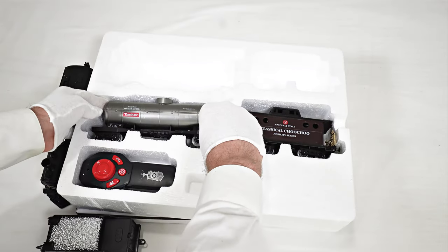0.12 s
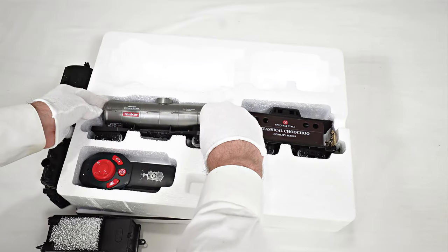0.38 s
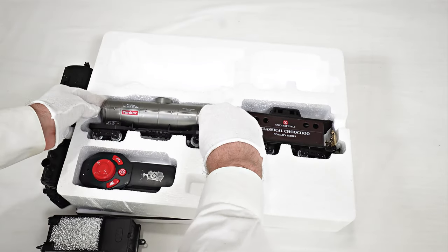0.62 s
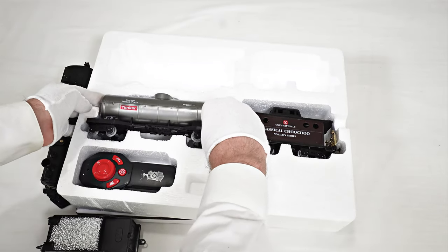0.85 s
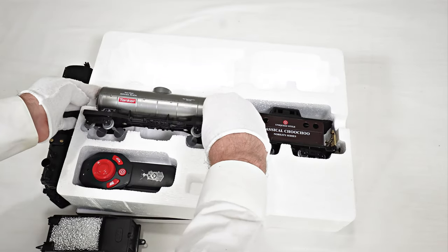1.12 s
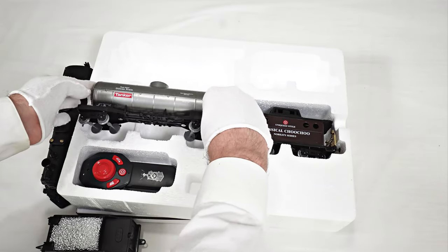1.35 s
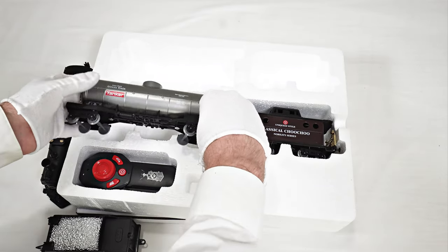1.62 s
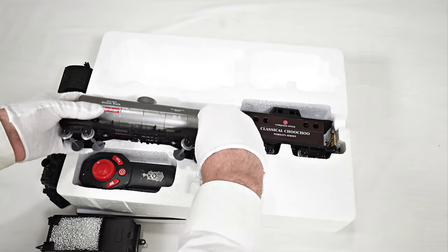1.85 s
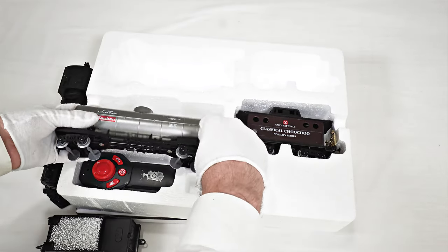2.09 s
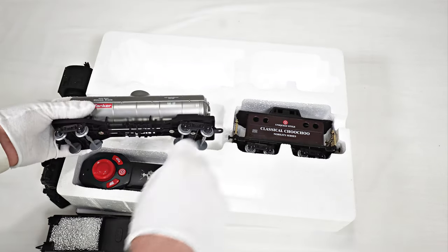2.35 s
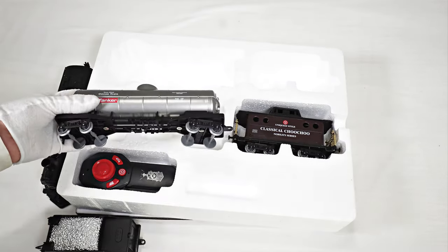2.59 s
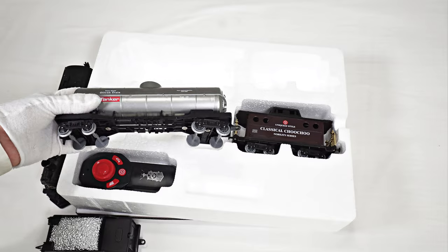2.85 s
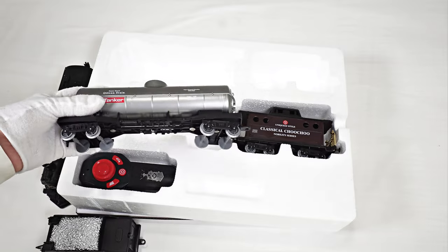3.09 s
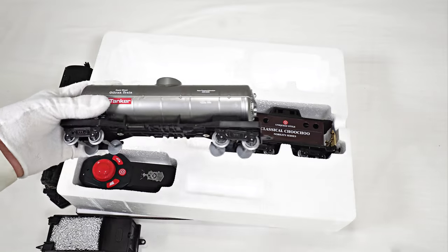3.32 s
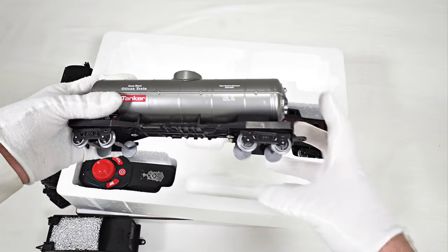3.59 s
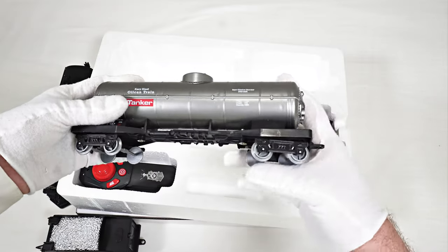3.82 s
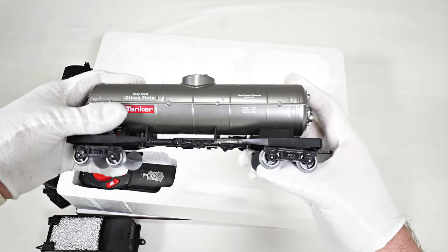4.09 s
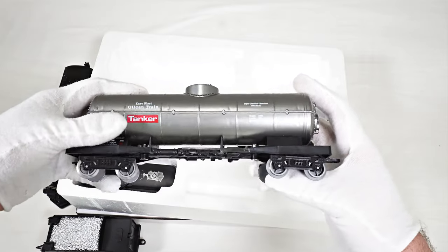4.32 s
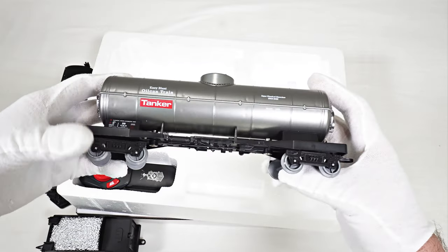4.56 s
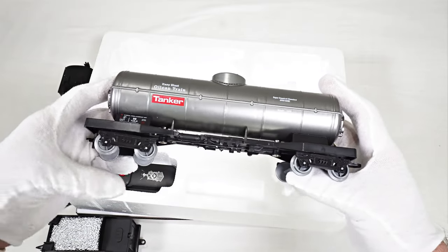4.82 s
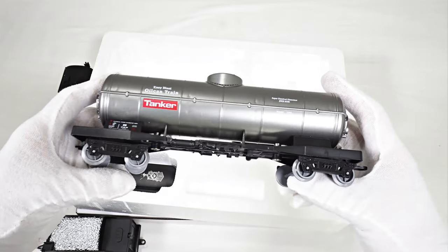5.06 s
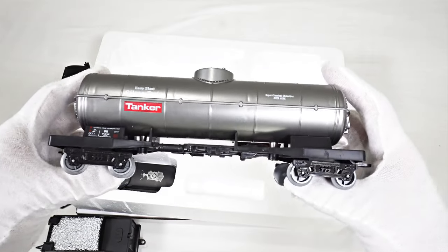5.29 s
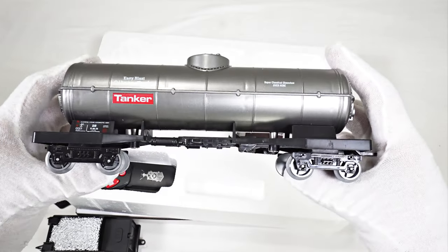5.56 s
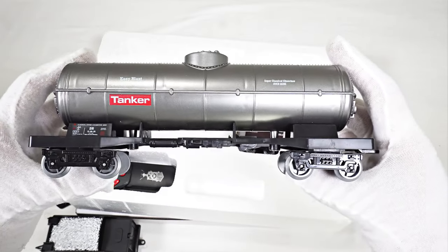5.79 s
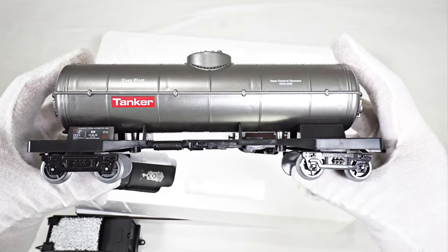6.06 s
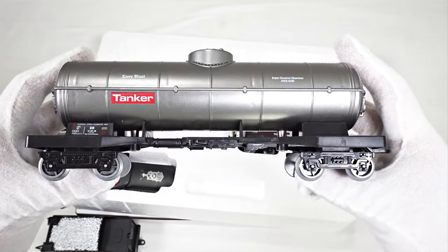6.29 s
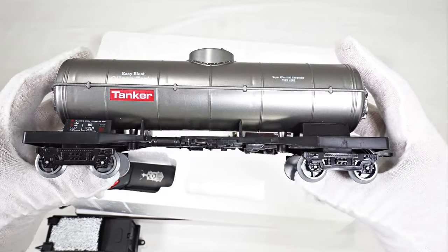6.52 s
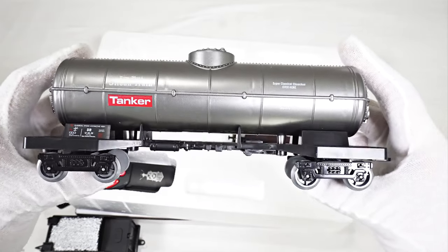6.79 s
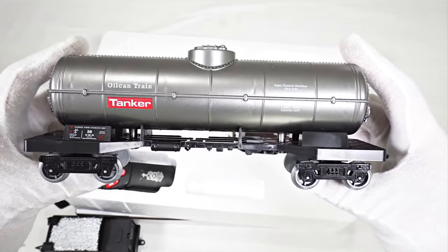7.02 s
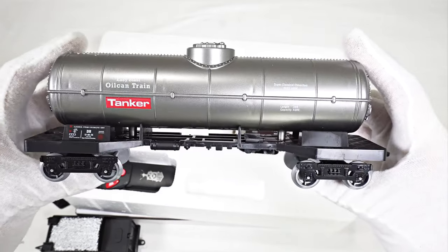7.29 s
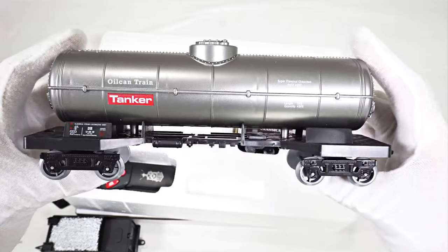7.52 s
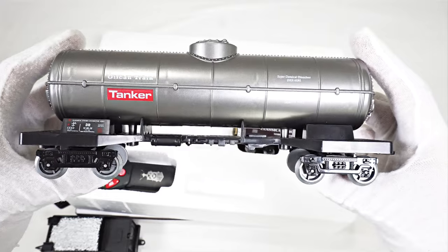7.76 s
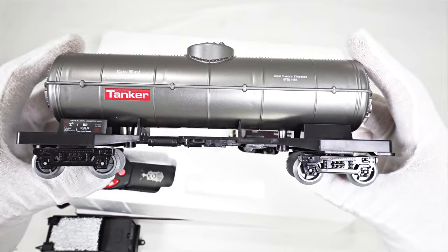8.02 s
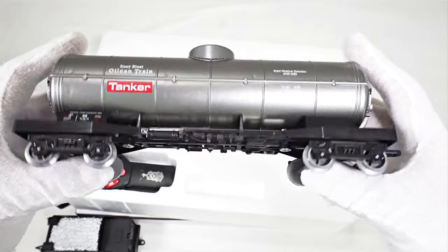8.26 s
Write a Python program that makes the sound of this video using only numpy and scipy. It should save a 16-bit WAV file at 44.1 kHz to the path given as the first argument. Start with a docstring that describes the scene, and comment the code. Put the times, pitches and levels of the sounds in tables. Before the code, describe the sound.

A close stereo pickup in a small, quiet room with faint hiss and low hum. From 0 to 0.4 s, foam rasps and bumps as a plastic toy tank car is tugged in its tray. Stronger, fizzing scrapes run from 0.55 to 1.1 s, with two faint thin squeaks and a loud, very short one near 0.85 s; a last scrape with a slight squeal comes around 1.4 s. From 1.65 to 2.3 s, plastic knocks and loose wheels clatter, sharpest just before 2 s. A soft sleeve swish passes around 2.7 s. Bright clicks return near 4 s, then irregular knocks, wheel chatter and hollow glove rubbing until 4.9 s. Another cluster of clacks at 5.2-5.4 s ends with a soft fingertip thump. Afterwards only quiet rustle and sparse, faint ticks remain, with a clearer click near 8.3 s.

```python
"""A small quiet room: gloved hands pull a plastic toy tank car out of a foam tray and turn it over.
The foam rasps and fizzes as its beads slip, and squeaks once loudly and twice faintly in regular slips.
Knocks and chattering loose wheel sets ring the shell's modes; fingertips thump the tank softly.
Gloves and sleeves rustle as coloured grains, which the hollow tank resonates. Room reflections follow
the near sounds; a faint hum and hiss lie below."""
import sys
import numpy as np
from scipy import signal
from scipy.fft import rfft, irfft
from scipy.io import wavfile

SR = 44100
rng = np.random.default_rng(int(sys.argv[2]) if len(sys.argv) > 2 else 0)


def level_to_linear(level):
    """Convert decibel levels to linear amplitude factors, elementwise."""
    exponent = np.asarray(level, float) / 20
    return 10 ** exponent


def wrap_up_sound(samples):
    """Save the sound to the file named by the first command line argument, as 16-bit audio."""
    columns = np.atleast_2d(samples).T
    # keep every value between -1 and 1, then stretch to whole-number steps
    tamed = np.clip(columns, -1, 1)
    steps = np.round(tamed * 32767).astype(np.int16)
    wavfile.write(sys.argv[1], SR, steps)


N = 369999


def rms_one(x):
    """Scale to unit rms."""
    return x / np.sqrt(np.mean(x ** 2) + 1e-20)


def in_time(rows):
    """Columns of a curve at every sample, after a gate that fades in and out at its ends."""
    s, *columns = np.transpose(rows)
    t = np.arange(N) / SR
    gate = np.clip(np.minimum(t - s[0] + .01, s[-1] + .01 - t) / .01, 0, 1)
    return gate, *[np.interp(t, s, c) for c in columns]


def at_hz(points, hz):
    """Read a spectrum on a log-frequency axis."""
    return np.interp(np.log(hz), np.log(np.array(points)[:, 0]), np.array(points)[:, 1])


def colour(x, spectrum):
    """Give a flat sound a spectrum; rms 1."""
    hz = np.maximum(np.fft.rfftfreq(x.shape[-1], 1 / SR), 1)
    return rms_one(irfft(rfft(x) * level_to_linear(at_hz(spectrum, hz)), x.shape[-1]))


def resonate(x, peaks):
    """Parallel resonances with alternating signs; rms 1."""
    out = 0
    for k, (hz, width_hz, db) in enumerate(peaks):
        r = np.exp(-np.pi * width_hz / SR)
        poles = [1, -2 * r * np.cos(2 * np.pi * hz / SR), r * r]
        out = out + (-1) ** k * level_to_linear(db) * signal.lfilter([1 - r * r, 0, r * r - 1], poles, x)
    return rms_one(out)


def ring(clicks, hz, t60):
    """A unit click sets a decaying sine of starting height 1 ringing."""
    r, w = level_to_linear(-60 / (t60 * SR)), 2 * np.pi * hz / SR
    return signal.lfilter([np.sin(w)], [1, -2 * r * np.cos(w), r * r], clicks + 1e-18)


def grains(per_s, spread_db):
    """Random clicks of either sign with a long tail of sizes."""
    size = level_to_linear(spread_db * np.minimum(rng.exponential(1, N), 4)) * rng.choice([-1, 1], N)
    return size * (rng.random(N) < per_s / SR)


def pan(x, db):
    """Place between the ears by left-over-right level."""
    return x * level_to_linear(np.array([db / 2, -db / 2]).reshape(2, -1))


def wide(make, alike):
    """A spread source: a shared draw plus and minus another."""
    alike = np.clip(alike, 0, 1)
    shared = np.sqrt((1 + alike) / 2) * make()
    return shared + np.sqrt((1 - alike) / 2) * make() * [[1], [-1]]


def swells(s, db, rise_db_per_s, fall_db_per_s):
    """Power-summed gain of efforts that build to a peak and die away, each along straight dB slopes."""
    t, power = np.arange(0, N + 32, 32) / SR, 1e-20
    for peak_s, peak_db, rise in np.broadcast(s, db, rise_db_per_s):
        slope_db = np.maximum(rise * (peak_s - t), fall_db_per_s * (t - peak_s))
        power = power + level_to_linear(2 * (peak_db - slope_db))
    return np.interp(np.arange(N) / SR, t, np.sqrt(power))


def drift(rate_hz):
    """Slow random wander with spread 1, drawn every 32 samples."""
    r = np.exp(-64 * np.pi * rate_hz / SR)
    slow = signal.lfilter([1], [1, -2 * r, r * r], rng.standard_normal(N // 32 + 1002))[1000:]
    return np.interp(np.arange(N) / 32, np.arange(len(slow)), rms_one(slow))


def floor():
    """Room tone and hiss, most alike in both ears in the bass, partly alike around 1.6 kHz and at the top,
    with a low hum of wavering pitch."""
    # room tone: f/Hz, level per Hz/dB
    tone = [(15, -35.5), (25, -14), (59, -10), (484, -16.5), (668, -24), (807, -25), (974, -35.5),
            (1140, -21.5), (2180, -24), (15600, -31.5)]
    # left-right likeness: f/Hz, correlation (negative counts as none)
    likeness = [(60, 0.99), (180, 0.63), (550, -0.72), (1650, 0.54), (4970, -0.44), (15000, 0.32)]
    tone_db, hum_db = -59.5, -66.5  # rms
    hum_hz, waver_hz = 58, 4.5
    alike = np.clip(at_hz(likeness, np.maximum(np.fft.rfftfreq(N, 1 / SR), 1)), 0, 1)
    mid, side = rfft(rng.standard_normal((2, N)))
    hiss = irfft(np.sqrt(1 + alike) * mid + np.sqrt(1 - alike) * side * [[1], [-1]], N)
    waver = rms_one(signal.lfilter([1], [1, -np.exp(-2 * np.pi * 4.35 / SR)], rng.standard_normal(N)))
    hum = np.sqrt(2) * np.sin(2 * np.pi * np.cumsum(hum_hz + waver_hz * waver) / SR)
    return level_to_linear(tone_db) * colour(hiss, tone) + level_to_linear(hum_db) * hum


def drag():
    """Foam beads slip by the thousand: they shake the tray, rasp and fizz."""
    # tugs that drag the car along the foam: peak t/s, slide level/dB, pressure over slide/dB, build-up/dB per s
    tugs = [(0.0, -69, 13, 300), (0.066, -49.5, 15.5, 330), (0.13, -45, 9.5, 105), (0.223, -41, 5, 63),
            (0.57, -40.5, 1, 77.5), (0.645, -38, 2.5, 168), (0.72, -33.5, 4, 502), (0.812, -35, -2.5, 598),
            (0.862, -47, -17, 60), (0.915, -33.5, -9.5, 88.5), (1.032, -42.5, 1.5, 42), (1.41, -42, -1, 63),
            (1.463, -38.5, -4, 59.5)]
    # jolts of the tray: peak t/s, level/dB
    jolts = [(0.0, -41.5), (0.062, -28.5), (0.124, -33), (0.298, -53.5), (0.38, -38.5), (0.644, -42.5),
             (0.912, -51)]
    # foam tray resonances: f/Hz, width/Hz, level/dB
    tray = [(542, 88, 10.5), (792, 113, 7), (1098, 77, 3), (1300, 47, 5.5), (1481, 50, 9)]
    # spectra of rasp and fizz: f/Hz, level per Hz/dB
    rasp_spectrum = [(710, -9), (1200, -3), (1510, -6), (1900, -3), (2030, -2.5), (3040, -1.5),
                     (4240, -5.5), (7000, -19.5), (9100, -57), (15400, -120)]
    fizz_spectrum = [(2940, -29.5), (5000, -1.5), (6310, -5), (8730, -1), (10600, -4), (12300, -2.5),
                     (15600, -2.5)]
    let_go_db_per_s = 196  # after each tug
    free_s, creep_db = 1.46, -55.5  # the slow slide between tugs lasts until the car comes free
    tray_db, tray_follows = -53.5, 0.17  # the tray's steady shaking, and how far it follows the pressure
    catch_db, catch_hz = 2.5, 36  # the slide catches and lets go

    s, db, press_db, rise = np.transpose(tugs)
    creep = swells(free_s, creep_db, 0, let_go_db_per_s)
    slide = np.hypot(creep, swells(s, db, rise, let_go_db_per_s))
    press = np.hypot(creep, swells(s, db + press_db, rise, let_go_db_per_s))
    held = creep / level_to_linear(creep_db) * level_to_linear(tray_db) * (press / level_to_linear(-53)) ** tray_follows
    shake = np.hypot(held, swells(*np.transpose(jolts), 700.5, 285))

    body_gain = shake * level_to_linear(catch_db * drift(catch_hz) - 4)
    body = body_gain * wide(lambda: resonate(grains(2500, 3.23), tray), .9)
    rasp_gain = press * level_to_linear(catch_db * drift(catch_hz) - 5.5)
    rasp = rasp_gain * wide(lambda: colour(grains(4000, 2.7), rasp_spectrum), 1.0)
    fizz = slide * level_to_linear(1.0) * wide(lambda: colour(grains(12000, 3.5), fizz_spectrum), .4)

    # a thin squeal joins the end of the pull
    squeal_peak = [(4283, 490, 0)]  # f/Hz, width/Hz, level/dB
    late = slide * swells(1.07, -10, 521, 0)
    squeal = late * resonate(resonate(grains(3000, 6.1), squeal_peak), squeal_peak)
    rub = pan(body, -1.9) + rasp + pan(fizz, 1.5) + squeal
    # light foam has no bass
    return signal.sosfilt(signal.butter(3, 280, "high", fs=SR, output="sos"), rub)


def car():
    """Each knock is a few ms of tiny contacts; they and the wheel chatter drive every mode by chance."""
    # knocks on the car: t/s, drive level/dB, weight on the shell/dB, hardness/dB
    knocks = [(0.0534, -31.5, 3, 1), (0.3757, -54, 22, -8), (0.8144, -36, 16, 0.5), (1.0852, -31.5, -6, -3),
              (1.651, -37.5, 2, -3), (1.6796, -36, 6, 4), (1.758, -25, -3.5, -8.5), (1.7952, -22, -18, -16),
              (1.9111, -23, -11, -10), (1.9693, -29, -18, -1), (1.9777, -11.5, -12, -7),
              (1.9824, -27, -12, 13.5), (2.1065, -34.5, -5.5, -4), (2.179, -30, -19.5, 2.5),
              (2.2275, -34.5, -17, -9), (2.31, -46.5, 6.5, -7), (3.818, -40.5, -24, 1),
              (3.829, -40.5, -0.5, -1), (3.881, -51.5, 0.5, -10), (3.940, -45, 2.5, -3),
              (3.9628, -17, -27, 3), (3.9829, -14, -26, -2.5), (4.044, -19.5, -10, 2.5),
              (4.168, -37.5, -9, -13), (4.2122, -29.5, -8, -4), (4.22, -24.5, -4.5, -16),
              (4.2416, -32, -9, -11), (4.2805, -28.5, -11, -25), (4.3097, -29.5, -6, -28),
              (4.3934, -36, -3, -12), (4.4138, -25, -11, -1.5), (4.4274, -29, -1, -4),
              (4.4488, -22, -18, -18), (4.5327, -40.5, 8, -16), (4.6969, -31.5, -22, -9),
              (4.946, -47.5, -2.5, -2), (5.1797, -23, -4, -10.5), (5.2692, -21, -14, -6),
              (5.3024, -21, -23, -6), (5.3313, -23, -9.5, -3), (5.3564, -55, -12, -26),
              (5.5553, -40.5, 4, -9), (6.1473, -52.5, 3, -0.5), (6.297, -44.5, 4, -5),
              (6.4737, -45, -15, -15), (6.493, -45.5, -4.5, -11), (6.5505, -32, -33, -13),
              (6.8575, -41, -12, -18), (7.2694, -52.5, -3, -17), (7.5742, -60.5, 15, -8),
              (7.6045, -47, -8, -22), (8.101, -38, -5.5, -28), (8.3165, -43, -2.5, -3),
              (8.3423, -24, -10, -12)]
    # loose wheels chatter when the car is shaken: peak t/s, drive level/dB
    shakes = [(1.71, -43), (1.831, -32), (2.04, -51), (2.23, -48), (2.31, -55), (3.899, -53.5), (4.13, -44),
              (4.32, -48.5), (4.5, -49), (4.62, -52), (4.761, -47.5), (4.919, -52), (5.222, -50),
              (5.45, -55), (5.62, -54)]
    # clearest modes of shell, frame and wheels: f/Hz, level/dB, t60/s
    clear_modes = [(1153, -28, .05), (1442, -10, .025), (2400, 2, 0.022), (3267, -3.5, 0.014),
                   (4500, -7, .025), (4890, -1, 0.011), (5470, -5, .011), (6340, -12, 0.012),
                   (7620, 4, 0.011), (9590, -13, 0.01)]
    # the many lesser modes: f/Hz, level/dB
    small_parts = [(1000, -15), (2000, 0), (4000, -2), (8000, -4), (15500, 6.5)]
    # left-right balance of the knocks and chatter over time: t/s, left over right level/dB
    balance = [(1.6, 2.5), (1.98, 5), (2.71, 0), (4.0, -4), (4.4, 6.5), (4.89, 0.0), (5.19, 5),
               (6.87, -7.5), (8.39, 5.5)]
    shell_droop_db = -5.5  # the shell's lowest modes take less of a blow
    chatter_low_db = -8  # chatter reaches the low modes less
    chatter_evens = .6  # light touches favour no mode strongly
    build_ms, contact_ms = 1, 3.65

    s, drive_db, low_db, high_db = np.transpose(knocks)
    top_db = -10.5 + .5 * high_db  # the top modes follow hardness
    at, out = (s * SR).astype(int), np.zeros(N)
    shaken = swells(*np.transpose(shakes), 138, 211)
    settling = swells(s, drive_db - 22.5, 9370, 150.5)  # each knock also sets the wheels chattering
    chatter = np.hypot(shaken, settling) * rms_one(grains(2200, 2.6))

    small_hz = np.geomspace(1000, 15500, num=36) * rng.uniform(.97, 1.03, 36)
    small_modes = [(hz, at_hz(small_parts, hz), 28 / hz) for hz in small_hz]  # t60 of 28 cycles

    after = np.arange(int(.04 * SR))
    after_ms = after * 1000 / SR
    where = np.minimum(at[:, None] + after, N - 1).ravel()
    fade = np.exp(-after_ms / contact_ms) * (1 - np.exp(-after_ms / build_ms))

    for hz, db, t60 in clear_modes + small_modes:
        tilt_db = []
        for low, high, top in zip(low_db, high_db, top_db):
            tilt = [(1200, low + shell_droop_db), (2300, low), (4000, 0.002), (7400, high), (11500, top)]
            tilt_db.append(at_hz(tilt, hz))
        spot_db = 2.5 * rng.standard_normal(len(at))  # each blow lands on another spot
        blow = level_to_linear(drive_db + np.array(tilt_db) + spot_db - 22)
        contact = np.bincount(where, (blow[:, None] * fade).ravel(), N)
        share = np.clip(np.log2(hz / 2000), 0, 1)
        dull_db = -6.0 * max(np.log2(hz / 6000), 0)  # light touches hardly reach the top modes
        touches = chatter * level_to_linear((1 - share) * chatter_low_db + dull_db - chatter_evens * db - 29.5)
        out += level_to_linear(db) * ring((contact + touches) * rng.standard_normal(N), hz, t60)
    # too small to radiate bass
    out = signal.sosfilt(signal.butter(4, 794, "high", fs=SR, output="sos"), out)
    return pan(out, in_time(balance)[1])


def squeaks():
    """Regular slips whose rate sags and climbs again: a tone, its octave, and an unsteady, fluttering grip."""
    # stick-slip squeaks on foam: start t/s, length/s, lowest slip rate f/Hz, level/dB, bend of the rate
    slips = [(.8465, .0285, 8000, -14.5, 3.6), (.543, .018, 15100, -36, .05), (.710, .034, 12500, -39, .02)]
    lowest_at, sag_shape = .3, 2.6  # share of the length; flatness of the sag
    flutter_s, flutter_db = 0.0075, 9
    rise_s, fall_s = .001, .005
    out = np.zeros(N)
    for s, length, low_hz, db, bend in slips:
        t = np.arange(int(length * SR)) / SR
        hz = low_hz * (1 + bend * np.abs(t / length - lowest_at) ** sag_shape)
        shape = np.minimum(np.minimum(t / rise_s, (length - t) / fall_s), 1) ** 2
        dip_db = flutter_db * np.cos(np.pi * t / flutter_s) ** 4 * (2 * t > flutter_s)
        shape = shape * level_to_linear(db - dip_db)
        wobble = rms_one(signal.lfilter([1], [1, -.9], rng.standard_normal(2000)))[:len(t)]
        phase = 2 * np.pi * np.cumsum(hz * (1 + .025 * wobble)) / SR  # unsteady slip rate
        octave = level_to_linear(-6.5) * np.sin(2 * phase) * (2 * hz < .45 * SR)
        out[int(s * SR):][:len(t)] += shape * (np.sin(phase) + octave)
    return pan(out, 5.8)


def thumps():
    """Soft pads excite one short low mode."""
    # fingertips on the tank: t/s, drive level/dB, mode f/Hz
    taps = [(0.648, -45, 530.5), (5.418, -41, 440)]
    out = np.zeros(N)
    for s, db, hz in taps:
        push = np.zeros(N)
        push[int(s * SR)] = level_to_linear(db)
        out += ring(ring(push, hz, 0.015), hz, 0.015) * level_to_linear(-29.5)  # ringing twice softens the onset
    return pan(out, 0.0)


def hands():
    """Cloth rubs softly; the gripped tank lifts two narrow bands out of the rub."""
    # gloves and sleeves moving: t/s, movement level/dB, grip on the tank level/dB
    moves = [(1.55, -60, -82), (1.89, -62, -64), (2.29, -64.5, -80), (3.21, -67.5, -79), (3.5, -67, -75.5),
             (3.72, -60.5, -77), (3.9, -63, -77), (4.18, -61.5, -60.5), (4.37, -58.5, -55),
             (4.6, -64.5, -67.5), (5.13, -59, -64), (5.38, -57, -57), (5.72, -66.5, -79), (6.1, -67.5, -76),
             (6.33, -65, -67.5), (6.94, -69.5, -73), (8.39, -70.5, -72.5)]
    # cloth spectrum: f/Hz, level per Hz/dB
    cloth_spectrum = [(88, -20), (150, -15.5), (314, -23), (346, -11.5), (426, -7), (556, -8), (698, -5),
                      (1020, -7), (14000, -21)]
    # air in the hollow tank: f/Hz, width/Hz, level/dB
    tank_air = [(791, 72, 4.5), (1198, 97, 7)]
    rumble_mean_db, rumble_follows = -71, 0.96  # sleeve rumble at mean movement
    sweep_s, sweep_db, sweep_width_s = 2.68, -51, 0.18  # a sleeve sweeps away
    gate, cloth_db, tank_db = in_time(moves)
    rumble_db = rumble_mean_db + rumble_follows * (cloth_db - cloth_db.mean())
    sweep = level_to_linear(sweep_db) * np.exp(-.5 * ((np.arange(N) / SR - sweep_s) / sweep_width_s) ** 2)
    dull = signal.butter(2, 1100, fs=SR, output="sos")
    cloth = wide(lambda: rms_one(signal.sosfilt(dull, colour(grains(2500, 2.6), cloth_spectrum))), 0.057)
    swish = wide(lambda: colour(grains(6000, 1.3), cloth_spectrum), 0.37)
    tank = resonate(resonate(grains(650, 3.5), tank_air), tank_air)
    rumble = wide(lambda: resonate(grains(1500, 1.7), [(231, 75, 0)]), 0.99)
    grip = level_to_linear(tank_db + 3.5 * drift(6.8))  # the grip on the tank is restless
    moving = level_to_linear(cloth_db) * cloth + level_to_linear(rumble_db) * rumble + grip * tank
    return gate * moving + sweep * swish


def room(x):
    """Dense reflections: noise that dies faster in the top treble, largely its own in each ear."""
    # decay of the room: f/Hz, t60/s
    decay = [(300, 0.22), (2000, 0.32), (8000, 0.18), (15000, 0.18)]
    t, tail = np.arange(int(.6 * SR)) / SR, 0
    edges = 150 * 2 ** np.arange(0, 7.5, 1)
    for low, high in zip(edges, edges[1:]):
        octave = signal.butter(2, [low, high], "band", fs=SR, output="sos")
        band = signal.sosfilt(octave, rng.standard_normal((2, len(t))))
        tail = tail + band * level_to_linear(-60 * t / at_hz(decay, np.sqrt(low * high)))
    # long waves reach both ears alike
    tail = tail + 0.48 * signal.lfilter([.2], [1, -.8], tail[::-1])
    tail = tail * np.clip((t - .003) / 0.002, 0, 1)
    tail = tail / np.sqrt(np.sum(tail ** 2, axis=1, keepdims=True))
    return level_to_linear(-2.5) * signal.fftconvolve(x.mean(axis=0, keepdims=True), tail, axes=1)[:, :N]


def scene():
    """Near sounds, their reflections, the rustling hands and the floor."""
    near = drag() + car() + squeaks() + thumps()
    return near + room(near) + hands() + floor()


def low_pass(x):
    """Removes everything above the highest recorded frequency."""
    return signal.sosfilt(signal.butter(12, 16960, fs=SR, output="sos"), x)


def record(dry):
    """A steep low-pass takes off the top, 60 dB down from 16.5 kHz."""
    cut = signal.sosfilt(signal.cheby2(12, 60, 16500, fs=SR, output="sos"), dry)
    return low_pass(cut)


dry = scene()
out = record(dry)
wrap_up_sound(out)
```